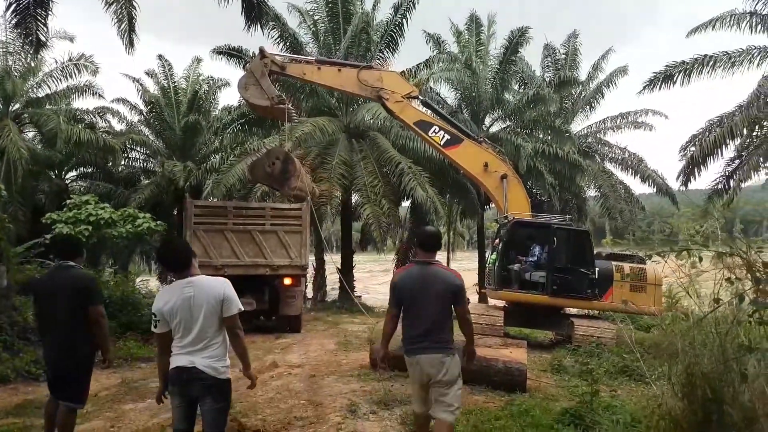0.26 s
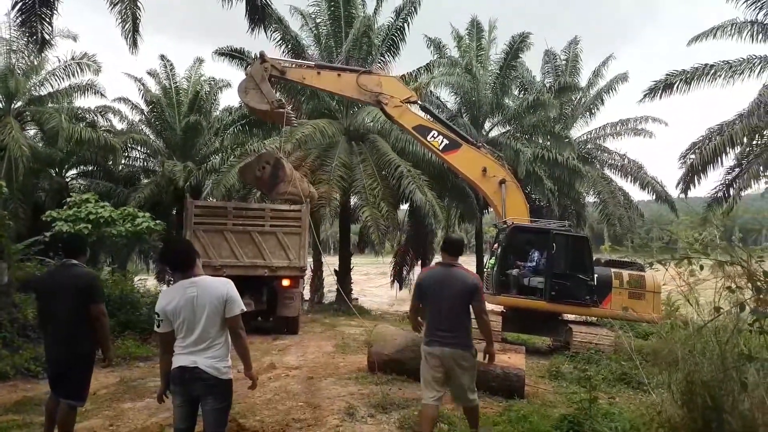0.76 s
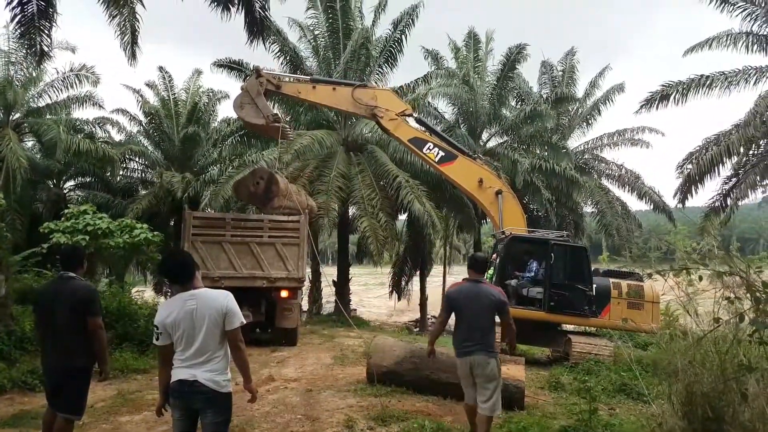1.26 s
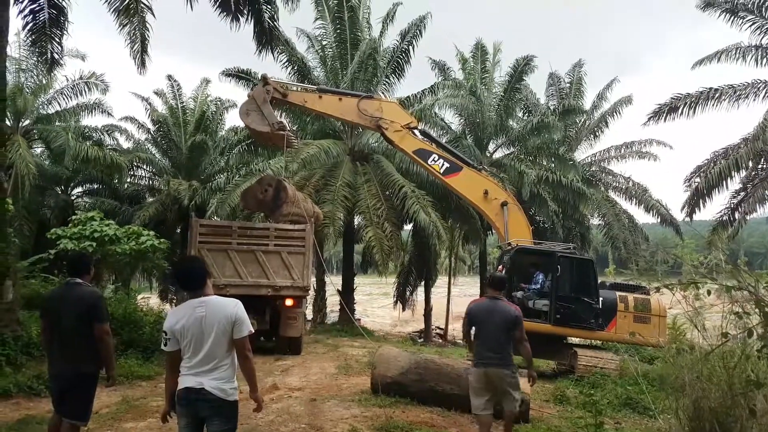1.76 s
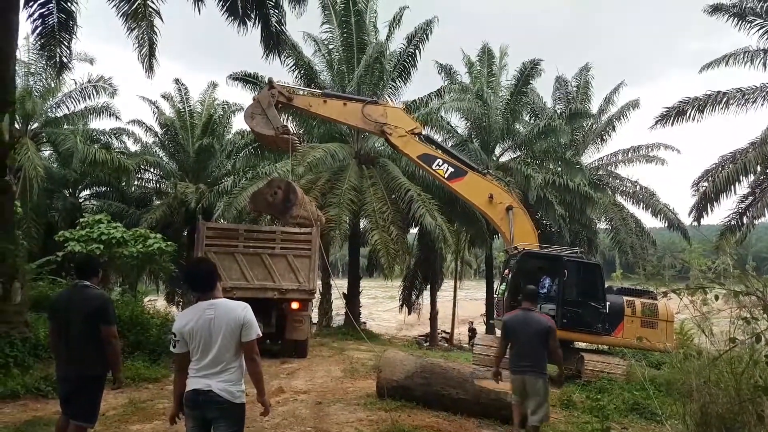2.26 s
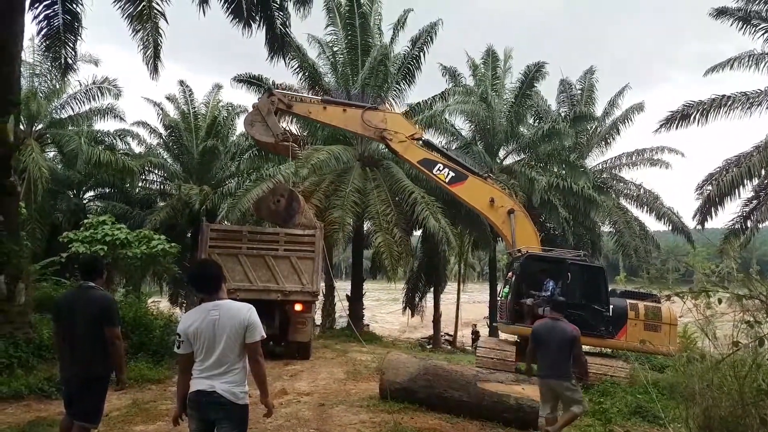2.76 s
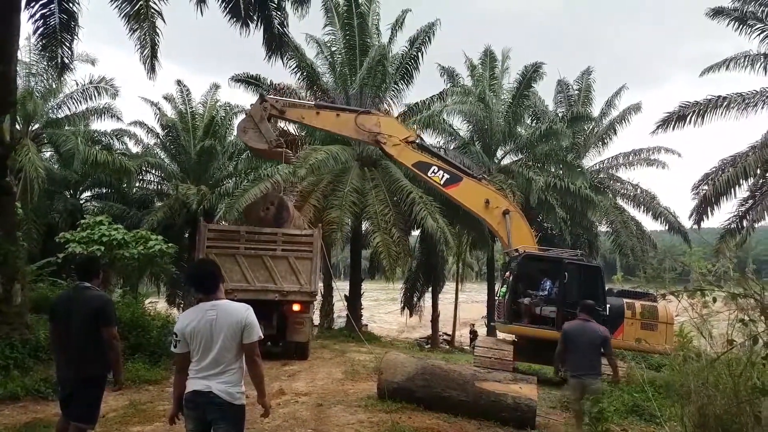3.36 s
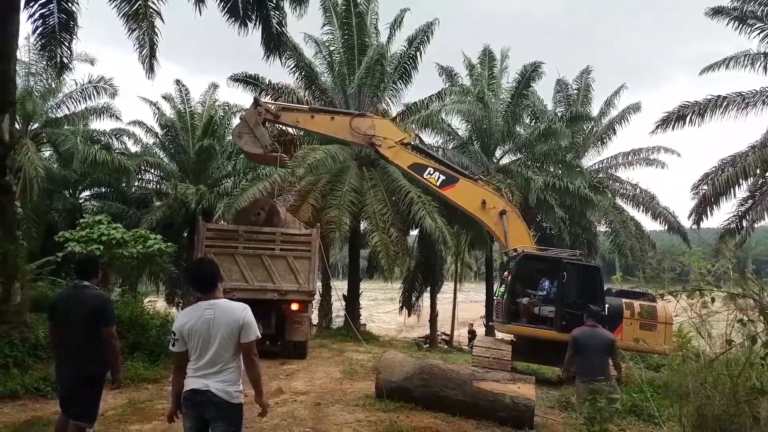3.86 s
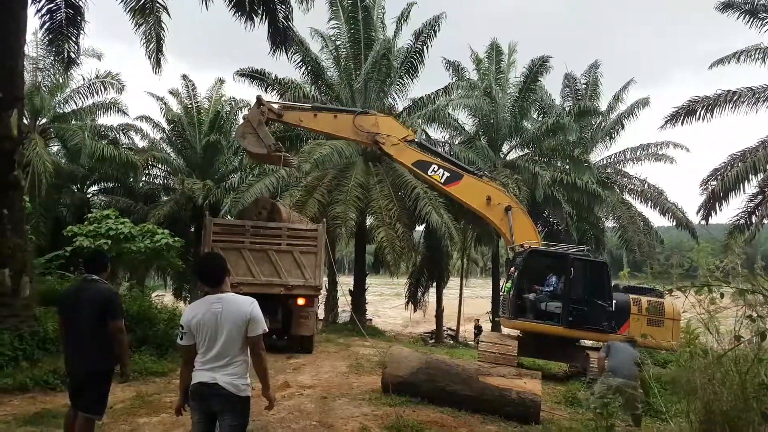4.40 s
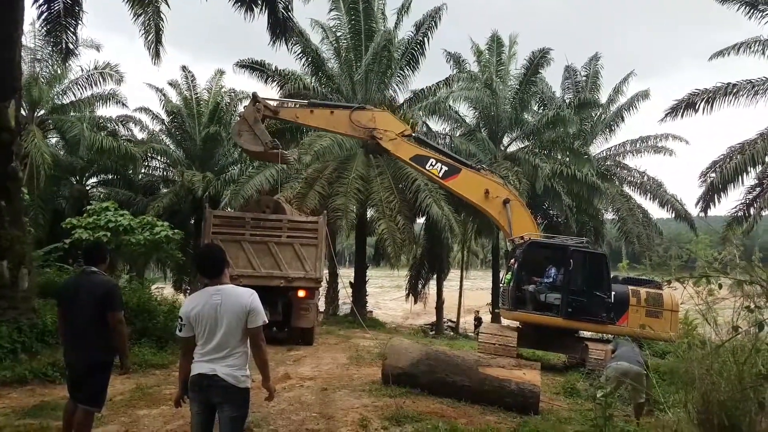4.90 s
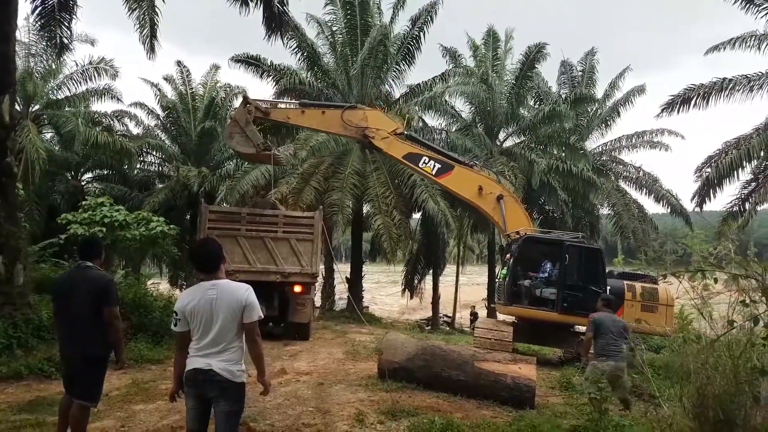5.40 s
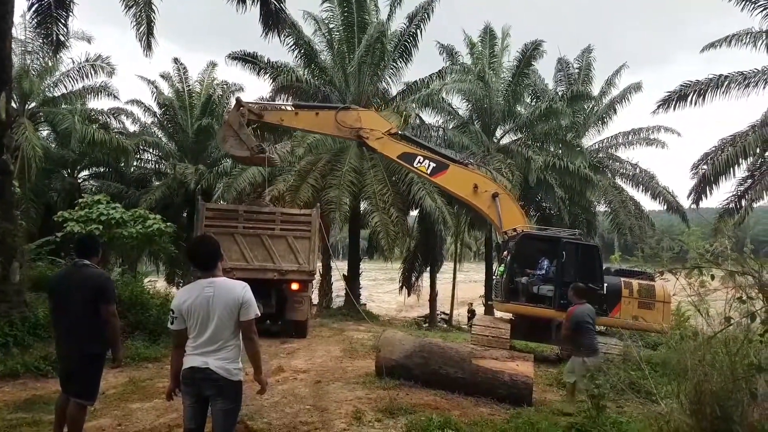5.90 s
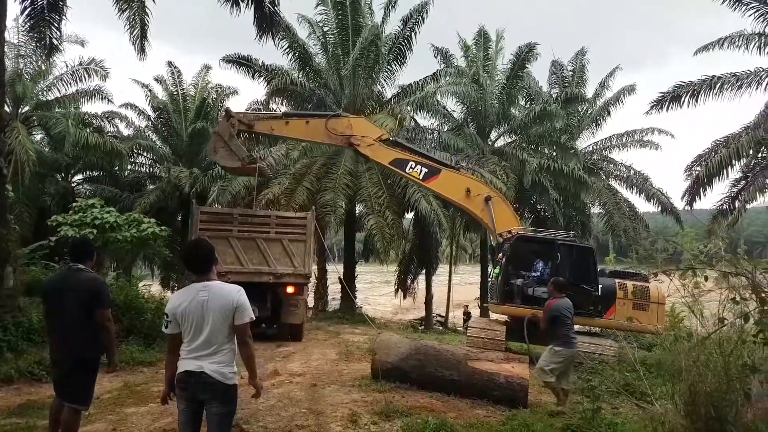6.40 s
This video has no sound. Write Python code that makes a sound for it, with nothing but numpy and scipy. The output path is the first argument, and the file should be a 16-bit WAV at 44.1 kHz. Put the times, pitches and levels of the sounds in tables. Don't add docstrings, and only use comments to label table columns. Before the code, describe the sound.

A large diesel excavator drones steadily outdoors while gusts of wind buffet and rumble on a hand-held phone, strongest in the first second.

```python
import sys
import numpy as np
from scipy import signal
from scipy.fft import rfft, irfft
from scipy.io import wavfile
from scipy.ndimage import uniform_filter1d

SR = 44100
rng = np.random.default_rng(int(sys.argv[2]) if len(sys.argv) > 2 else 0)


def dump(signal):
    limited = np.clip(np.atleast_2d(signal).T, -1, 1)
    pcm = np.round(limited * 32767).astype(np.int16)
    wavfile.write(sys.argv[1], SR, pcm)


def volts_from_db(level):
    exponent = np.asarray(level, float) / 20
    return 10 ** exponent


N = 293265
TIME = np.arange(N) / SR
FREQ = np.maximum(np.fft.rfftfreq(N, 1 / SR), 1)
LEFT_LAG_S = 7 / SR

# time_s, level_db
WIND = [(0, -27), (.3, -27.5), (.7, -29.5), (1.1, -33.5), (1.65, -36), (1.95, -32.5), (2.4, -39),
        (2.75, -34.5), (3.1, -35.5), (3.6, -37), (3.95, -33.5), (4.2, -31.5), (4.45, -36), (4.68, -31),
        (5.1, -33.5), (5.7, -37), (6.65, -38.5)]
# centre_hz, width_hz, trim_db, follow (dB per dB of wind)
RUMBLE_BANDS = [(51.7, 30, -9, 1.1), (90, 31, 0, 0.94), (133, 58, 1.5, 1.46), (217, 121, -1, 0.89)]
# peak_s, peak_db, pitch_hz
BUFFETS = [(.048, -13.5, 128), (0.174, -14, 116.6), (.35, -13, 106), (0.411, -13.5, 125), (.57, -15.5, 107),
           (.62, -20.5, 110), (.84, -20.5, 137), (.265, -20, 140.5), (1.03, -24, 115), (1.34, -27, 135),
           (1.47, -29, 130), (1.75, -29.5, 125), (2.09, -23, 99), (2.26, -26, 103.5), (2.74, -22, 94),
           (2.89, -37, 130), (3.05, -22.5, 108), (3.2, -24, 90), (3.36, -22.5, 111.6), (3.92, -29, 127.3),
           (4.14, -21.5, 104), (4.32, -25, 89.4), (4.53, -23, 93.5), (4.65, -24, 111.3), (4.85, -27, 90),
           (4.98, -22, 131.2), (5.23, -35, 130), (5.4, -26, 90), (6.07, -29, 108.8), (6.32, -28, 124.5)]


def unit(x):
    return x / np.sqrt(np.mean(x ** 2))


def columns(table):
    s, *values = np.transpose(table)
    return [np.interp(TIME, s, v) for v in values]


def over_freq(table):
    hz, value = np.transpose(table)
    return np.interp(np.log(FREQ), np.log(hz), value)


def walk(rate_hz):
    hold = int(SR / rate_hz)
    steps = np.repeat(rng.standard_normal(N // hold + 1), hold)
    return 1.7 * uniform_filter1d(uniform_filter1d(steps, hold), hold)[:N]


def hump(hz, width_hz):
    return np.exp(-.5 * ((FREQ - hz) / (width_hz / 2)) ** 2)


def swell(centre_s, half_s):
    return np.exp(-.5 * ((TIME - centre_s) / (half_s / 2)) ** 2)


def at_ports(spectrum):
    # freq_hz, balance_db
    balance = [(60, 2.5), (110, -1), (200, -0.5), (380, 0), (700, 0), (1290, -0.5), (2380, -3), (4400, -4),
               (8120, -0.5), (15000, -3)]
    tilt = volts_from_db(over_freq(balance) / 2)
    late = np.exp(-2j * np.pi * FREQ * LEFT_LAG_S)
    return np.array([spectrum * tilt * late, spectrum / tilt])


def stereo_noise(direct, likeness):
    left, right = rfft(rng.standard_normal((2, N)))
    share = np.clip(over_freq(likeness), 0, 1)
    scattered = np.array([at_ports(left)[0], at_ports(right)[1]])
    return np.sqrt(share) * at_ports(rfft(direct)) + np.sqrt(1 - share) * scattered


def eddies(noise, hz, width_hz):
    band = unit(irfft(noise * hump(hz, width_hz), N))
    power = uniform_filter1d(uniform_filter1d(np.mean(band ** 2, axis=0), 2000), 2000)
    return unit(band / np.sqrt(power + 0.062))


def gustiness():
    # peak_s, peak_db, pitch_hz
    shoves = [(.11, -26, 48), (.34, -41, 48), (.78, -31, 48), (1.88, -30, 48), (2.26, -30, 48),
              (2.5, -26.5, 48), (2.74, -35, 48), (3.2, -32, 48), (3.95, -26, 48.3), (4.1, -32, 48),
              (4.8, -35, 48), (5.4, -49, 48)]
    # peak_s, peak_db, pitch_hz
    flaps = [
        (.05, -18, 240),
        (1.96, -24, 245),
        (2.13, -22, 240),
        (3.72, -25, 230),
        (3.91, -23, 249),
        (4.54, -39, 240),
        (4.63, -21, 250),
    ]
    flicker_db, ragged_db = 1.5, -7
    half_cycles, spread_octaves = 6, 0.24
    hz, _, trim_db, follow = np.transpose(RUMBLE_BANDS)[:, :, None]
    flickers_db = flicker_db * np.array([walk(20) for _ in RUMBLE_BANDS])
    steady_db = follow * (columns(WIND)[0] + 32) - 32 + trim_db
    power = volts_from_db(steady_db + flickers_db) ** 2
    for s, db, pitch_hz in BUFFETS + shoves + flaps:
        near = np.exp(-(np.log2(pitch_hz / hz) / spread_octaves) ** 2)
        power = power + volts_from_db(db + ragged_db) ** 2 * near * swell(s, half_cycles / pitch_hz)
    return np.sqrt(power)


def vortices():
    core_db, half_cycles = -1.5, 3
    out = 0
    for s, db, pitch_hz in BUFFETS:
        envelope = np.sqrt(2 * swell(s, half_cycles / pitch_hz))
        out = out + volts_from_db(db + core_db) * envelope * np.sin(2 * np.pi * (pitch_hz * TIME + rng.random()))
    return out


def wind():
    # freq_hz, share (0-1)
    wind_likeness = [(30, 0.96), (80, .998), (150, 0.98), (300, 0.89), (500, 0.9)]
    noise = stereo_noise(rng.standard_normal(N), wind_likeness)
    rumble = 0
    for gain, (hz, width_hz, *_) in zip(gustiness(), RUMBLE_BANDS):
        rumble = rumble + gain * eddies(noise, hz, width_hz)
    spill_db = 0.81 * (columns(WIND)[0] + 30) - 42
    return rumble + vortices() + volts_from_db(spill_db) * eddies(noise, 375, 185)


def airflow():
    # time_s, level_db
    effort = [(0, 1.5), (.8, 0.5), (3.1, -2.5), (4.3, -2.5), (4.6, 0.5), (5.2, -0.5), (5.45, -.5),
              (5.8, -0.5), (6.65, -1.5)]
    # start_s, length_s, level_db
    fronds = [
        (.9, 1.1, 1),
        (2.0, .74, 4.5),
        (2.9, .9, 1),
        (5.5, 1.1, 1.3),
    ]
    effort_db = columns(effort)[0]
    puff_db = 2 * swell(4.65, .07)
    leaves_db = 0
    for start_s, length_s, db in fronds:
        leaves_db = leaves_db + db * np.sin(np.pi * np.clip((TIME - start_s) / length_s, 0, 1))
    roar_db = effort_db + puff_db
    drone_db = 0.16 * effort_db - .5 * TIME
    rush_db = .05 * effort_db + 0.25 * leaves_db + puff_db
    return [roar_db, drone_db, rush_db, leaves_db]


def clatter(turns):
    fresh = rng.standard_normal((int(turns[-1] / 2) + 2, 4096))
    cycles = signal.lfilter([1], [1, -0.32], fresh, axis=0)
    return unit(cycles.ravel()[(turns / 2 * 4096).astype(int)])


def panel_modes(depth_db, spacing_hz):
    nodes = np.arange(0, SR / 2, spacing_hz)
    return depth_db * np.interp(FREQ, nodes, rng.standard_normal(len(nodes)))


def housing(turns):
    # freq_hz, density_db (per Hz)
    roar = [(250, -42), (420, -11.5), (661, -4.5), (816, -8.5), (1100, -11.5), (1190, -12), (1360, -13),
            (2420, -16.5), (8100, -30.5), (9570, -34.5), (15500, -33)]
    # centre_hz, width_hz, gain_db
    resonances = [(425, 163, 6.5), (479, 35, -2.5), (598, 96, 3.5), (992, 166, 4.5), (1050, 40, 1.5),
                  (1375, 146, 4.5), (1750, 59, 3), (2240, 410, 3), (2705, 84, 3), (4010, 470, 4),
                  (4910, 610, 2.5), (8270, 990, 2.5), (9270, 980, -2.5), (11800, 1000, 2.5)]
    # freq_hz, share (clipped to 0-1)
    likeness = [(200, 2.7), (500, 0.4), (800, 2.55), (1100, 0.5), (1800, .5), (3500, 0.13), (8000, 0.12),
                (15000, 0.24)]
    knock = 1 + 0.24 * np.exp(-(3 * turns % 1) / .3)
    colour_db = over_freq(roar)
    for hz, width_hz, db in resonances:
        colour_db = colour_db + db * hump(hz, width_hz)
    colour_db = colour_db + 0.41 * (FREQ > 1500)
    colour_db = colour_db + panel_modes(1.5, 13) * (FREQ > 760)
    noise = stereo_noise(unit(knock * clatter(turns)), likeness) * volts_from_db(colour_db)
    roar_db, drone_db, rush_db, hiss_db = (c - c.mean() for c in airflow())
    swells_db = 4 * [roar_db] + [drone_db] + 6 * [rush_db] + [.8 * hiss_db, 1.3 * hiss_db]
    out = 0
    for k, swell_db in enumerate(swells_db):
        octaves_off = np.log2(FREQ) - 8 - k / 2
        band = np.cos(np.pi * np.clip(octaves_off, -.5, .5)) ** 2
        out = out + volts_from_db(swell_db + 0.28 * walk(1.21)) * irfft(noise * band, N)
    return volts_from_db(-37) * unit(out)


def tones(turns):
    # time_s, fuelling_db, pressure_db
    load = [(0, -5, -6), (.9, 1, -5), (1.3, 0, -2.5), (1.7, 1, 0.5), (2.25, -2.5, -4), (2.6, 0, 1),
            (3.65, 1, -1), (3.95, -2.5, -4), (5, -2, -2.5), (5.4, 0, 1.5), (5.9, 0, -0.5), (6.3, 0.5, 3.5),
            (6.65, -1.5, -1)]
    orders = [3, 6, 8.5, 9, 17, 18, 25.5, 27, 31, 36, 42, 51]
    order_levels = [-32, -35, -33.5, -36, -67, -48, -55.5, -51, -53, -63, -72, -58.5]
    engine_db, pump_db = columns(load)
    heard = np.array([np.interp(TIME - LEFT_LAG_S, TIME, turns), turns])
    out = 0
    for order, db in zip(orders, order_levels):
        load_db = engine_db if order < 10 else pump_db
        waver = 0.0048 * order * walk(8) + rng.random()
        flutter_db = (1.2 + 0.031 * order) * walk(7)
        tone = np.sqrt(2) * np.sin(2 * np.pi * (order * heard + waver))
        out = out + volts_from_db(db + load_db + flutter_db) * tone
    return out * volts_from_db(np.array([[-.2], [.2]]))


def scene():
    # time_s, speed_hz (turns a second)
    shaft = [(0, 22.1), (.9, 21.95), (1.5, 21.6), (2, 21.4), (2.3, 21.3), (2.7, 21.5), (3.6, 21.55),
             (3.9, 22.1), (4.1, 22.5), (4.5, 22.2), (5, 21.7), (5.2, 21.5), (6.65, 21.55)]
    turns = np.cumsum(columns(shaft)[0]) / SR
    return wind() + housing(turns) + tones(turns)


def top_cut(x):
    return signal.sosfilt(signal.butter(12, 15660, fs=SR, output="sos"), x)


def record(dry):
    faded_in = dry * np.clip(TIME / .003, 0, 1)
    rounded = np.tanh(1.079 * faded_in) / 1.03
    return top_cut(rounded)


dry = scene()
out = record(dry)
dump(out)
```